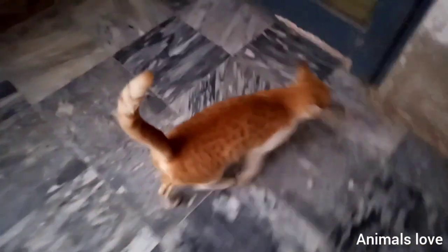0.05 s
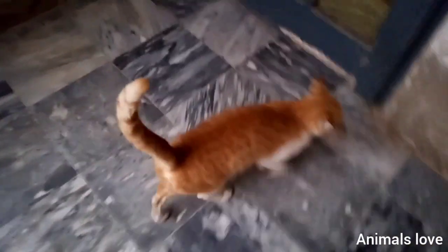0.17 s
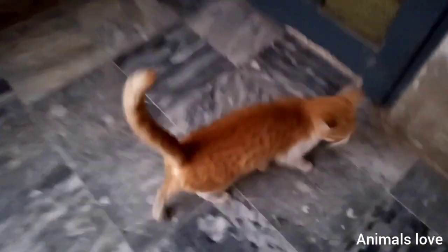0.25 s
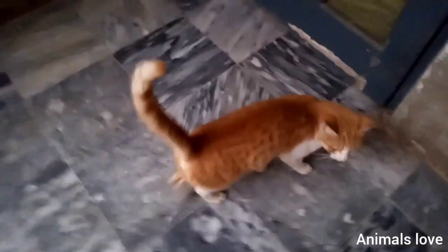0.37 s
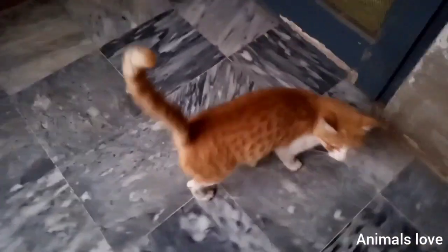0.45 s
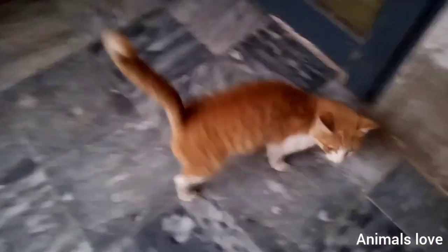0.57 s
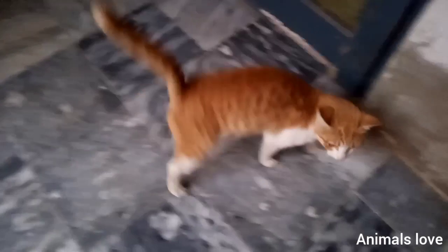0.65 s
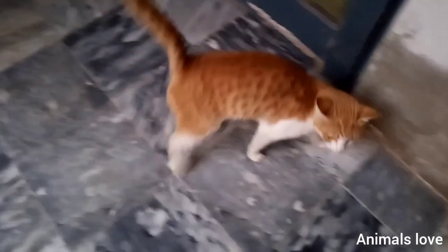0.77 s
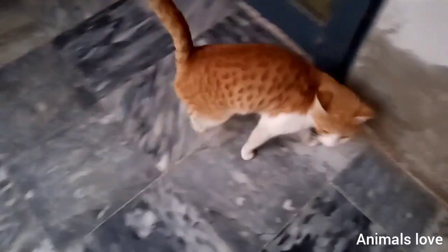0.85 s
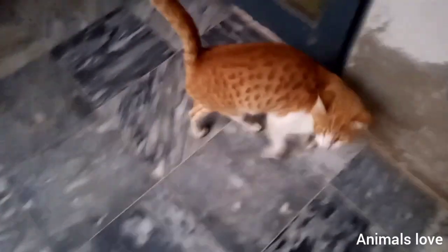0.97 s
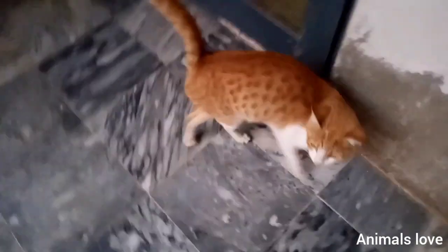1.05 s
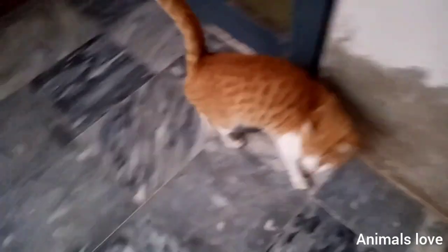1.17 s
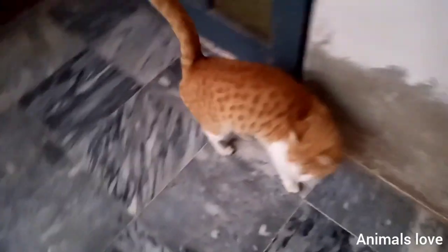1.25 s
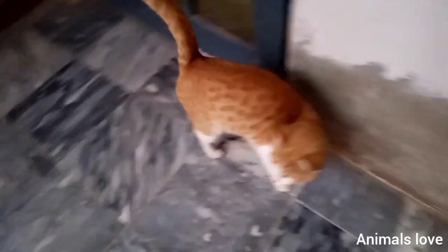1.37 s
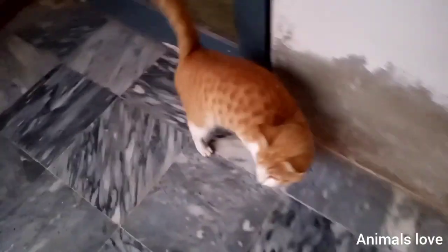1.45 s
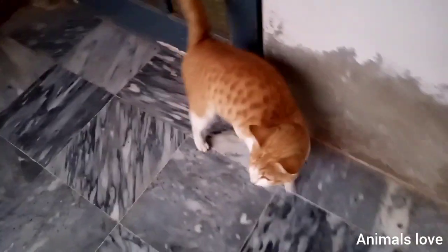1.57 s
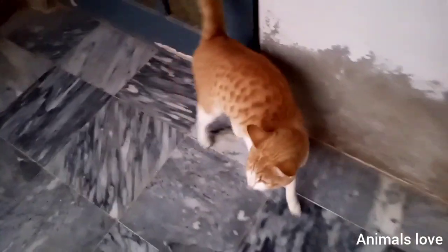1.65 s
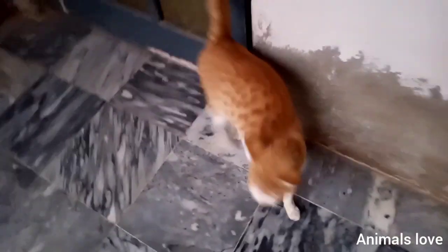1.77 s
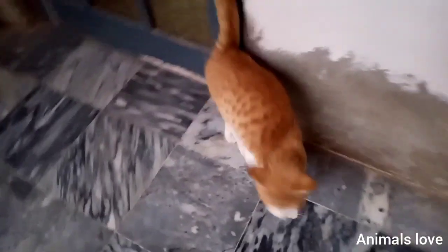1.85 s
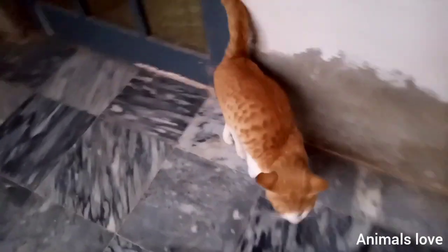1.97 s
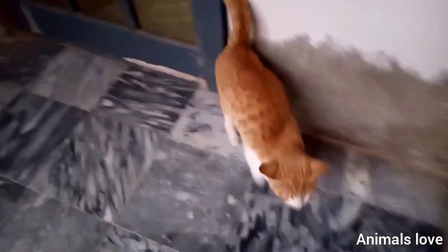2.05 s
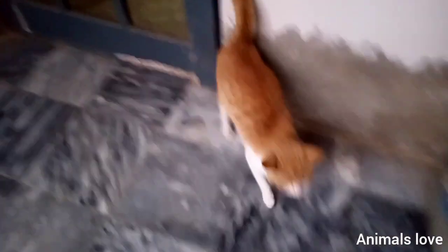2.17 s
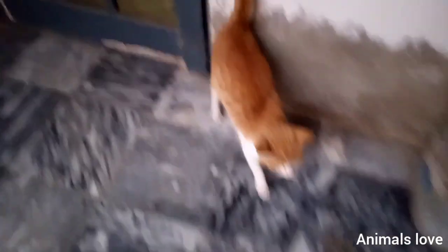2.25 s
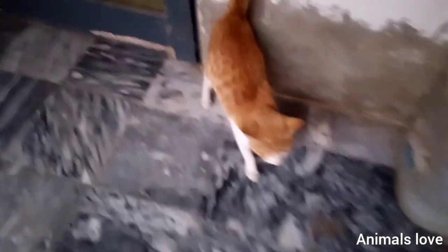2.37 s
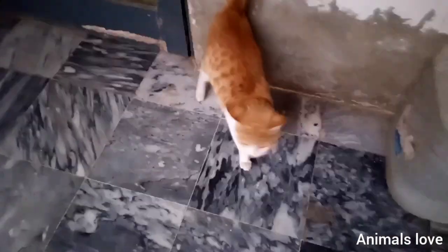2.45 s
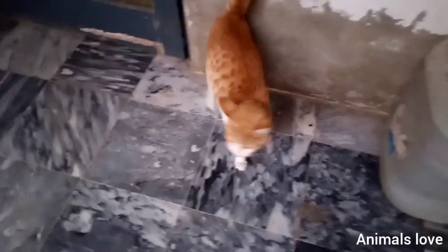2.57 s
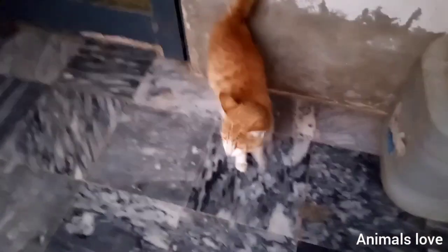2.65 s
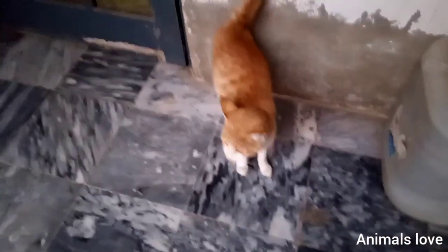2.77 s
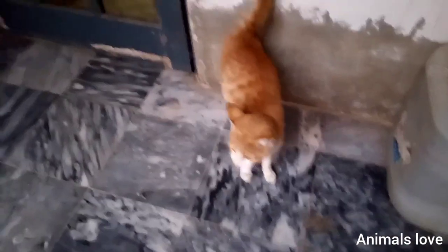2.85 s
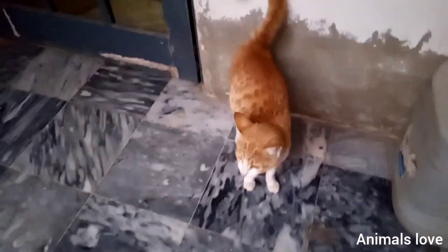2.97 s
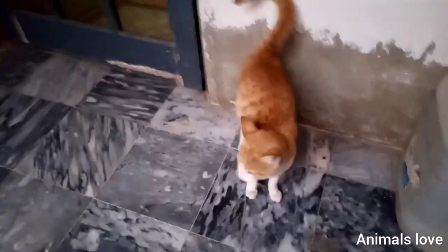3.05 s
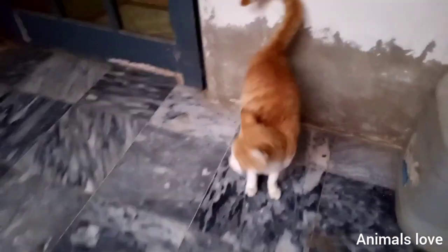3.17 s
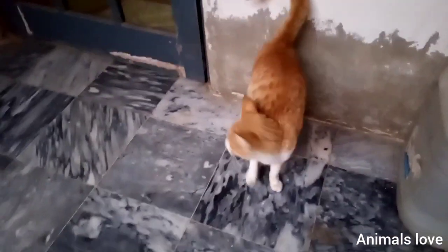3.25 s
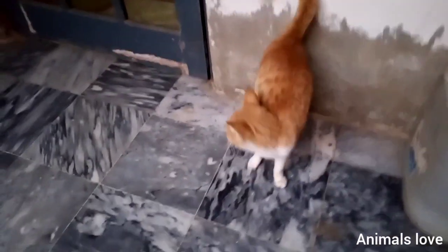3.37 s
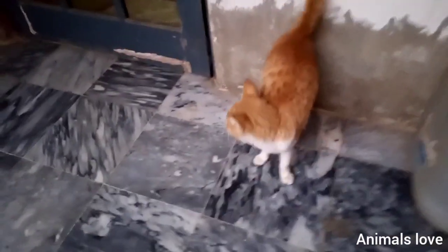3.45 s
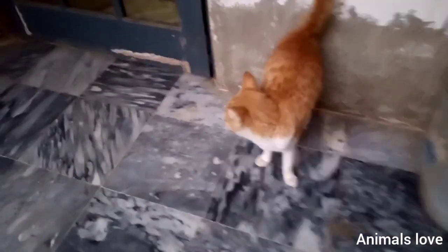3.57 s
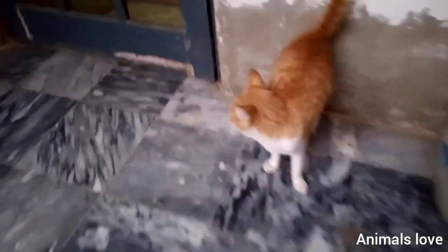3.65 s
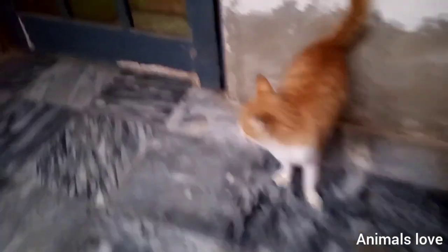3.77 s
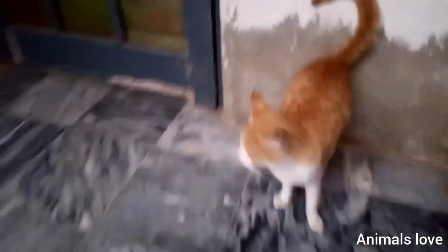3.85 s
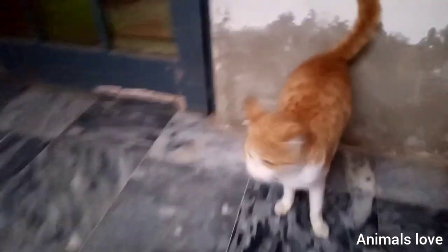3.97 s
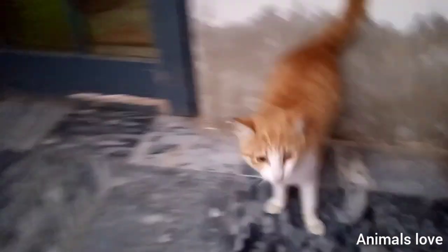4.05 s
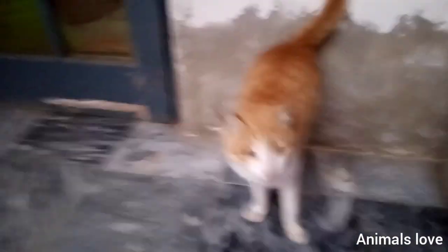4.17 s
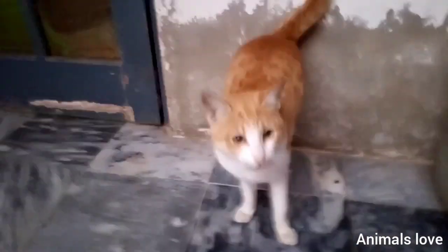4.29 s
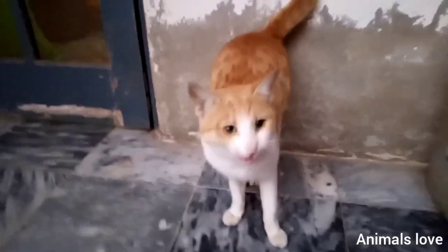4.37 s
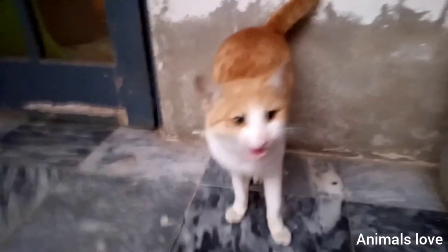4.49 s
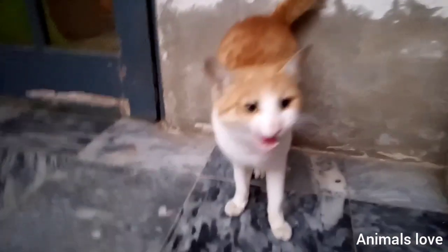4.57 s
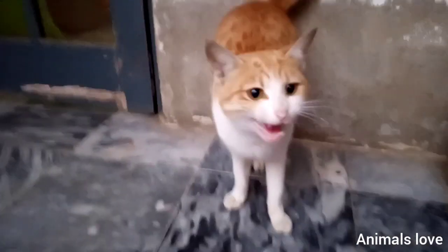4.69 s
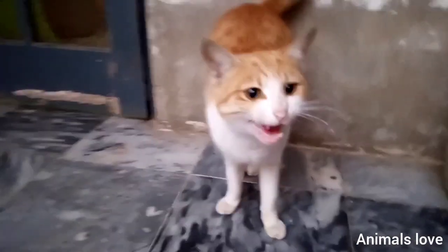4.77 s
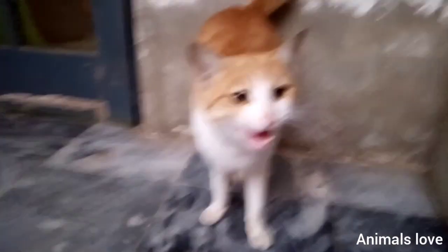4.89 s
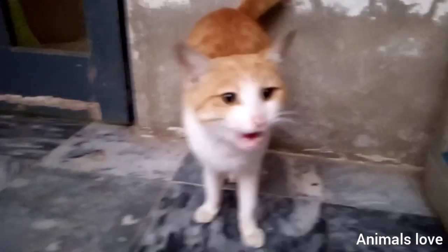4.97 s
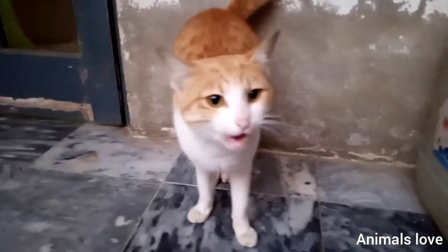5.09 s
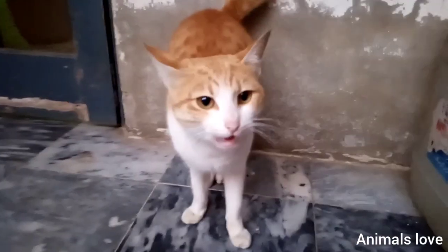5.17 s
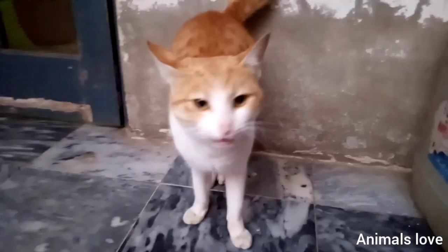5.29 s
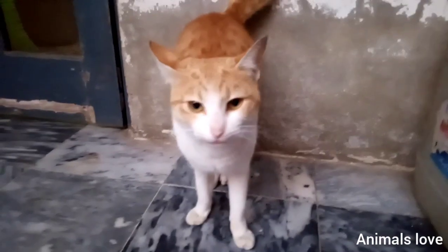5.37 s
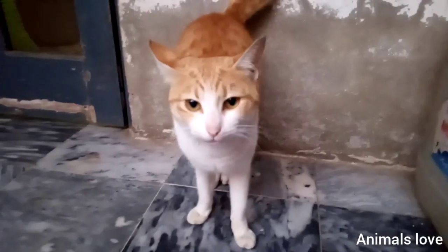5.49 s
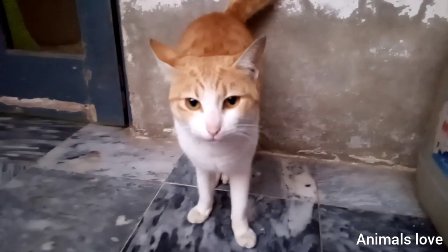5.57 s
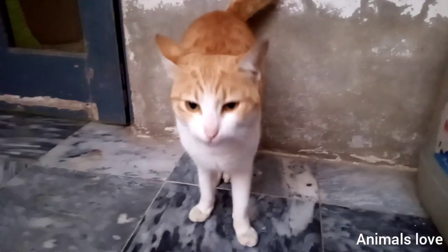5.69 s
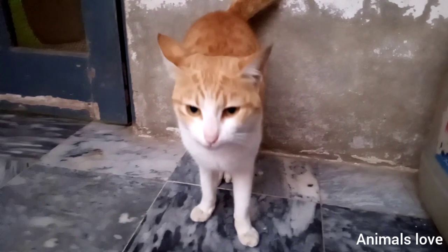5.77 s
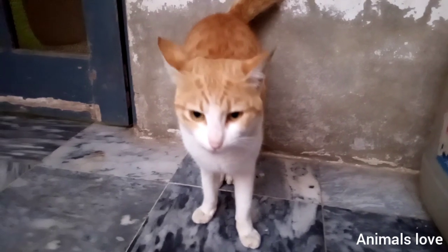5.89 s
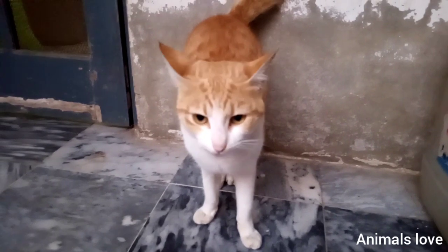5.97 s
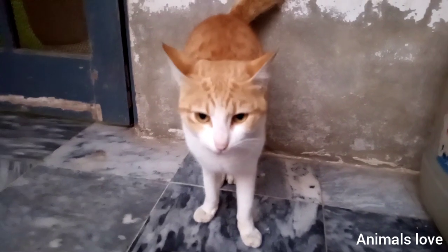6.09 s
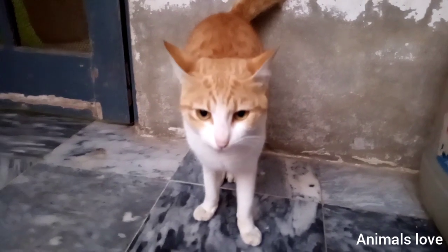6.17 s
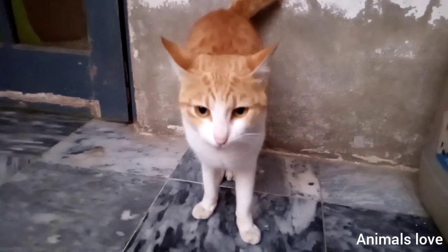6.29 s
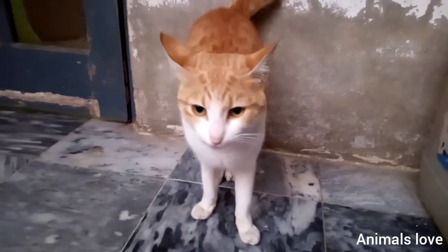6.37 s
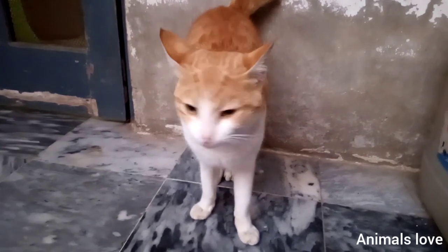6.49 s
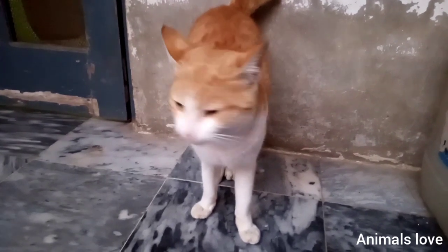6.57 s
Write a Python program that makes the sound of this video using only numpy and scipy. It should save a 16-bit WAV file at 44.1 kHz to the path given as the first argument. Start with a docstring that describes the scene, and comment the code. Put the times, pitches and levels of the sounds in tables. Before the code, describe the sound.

In a quiet hard room, a cat meows twice at length amid faint rubs and footfalls, before something heavy drags, squeals and booms.

```python
"""A cat on a stone floor ends one meow amid a few ticks and two spurts of thin hiss.
Skin rubs and slides, soft footfalls sound, and a thin whine comes and goes over the quiet hiss of a hard room.
Two long meows follow, each opening from a closed-mouth murmur: harmonics of the vocal folds pass nose and mouth.
At the end something heavy, perhaps a door, scrapes along in slips, squeals, thumps and booms on.
"""
import sys
import numpy as np
from scipy import signal
from scipy.fft import rfft, irfft, next_fast_len
from scipy.io import wavfile

SR = 44100
rng = np.random.default_rng(int(sys.argv[2]) if len(sys.argv) > 2 else 0)


def digitize_waveform(pressure):
    """Quantize a signal to 16-bit integers and store it at the path in sys.argv[1].

    Rows of a 2-D input are taken as channels; values are limited to [-1, 1].
    """
    field = np.atleast_2d(pressure).T
    bounded = np.clip(field, -1, 1)
    quanta = np.round(bounded * 32767).astype(np.int16)
    wavfile.write(sys.argv[1], SR, quanta)


N = 292383
TIME = np.arange(N) / SR


def amp(db):
    """Decibels to gain."""
    return 10 ** (np.asarray(db) / 20)


def unit(x):
    """Scales to rms 1."""
    return x / np.sqrt(np.mean(x ** 2) + 1e-20)


def read(points, hz):
    """Reads a spectrum on a log-frequency axis."""
    f, value = np.transpose(points)
    return np.interp(np.log(hz + 1), np.log(f + 1), value)


def follow(rows, t):
    """Reads every column of a curve at the times t."""
    s, *columns = np.transpose(rows)
    return [np.interp(t, s, c) for c in columns]


def add(mix, s, sound):
    """Mixes a sound in at time s."""
    part = mix[max(0, round(s * SR)):][:len(sound)]
    part += sound[:len(part)]


def colour(x, points):
    """Filters by a spectrum, to rms 1."""
    gain = amp(read(points, np.fft.rfftfreq(len(x), 1 / SR)))
    return unit(irfft(rfft(x) * gain, len(x)))


def wander(size, hz):
    """Smooth chance up to about a given rate, rms 1."""
    n = next_fast_len(size)
    f = np.fft.rfftfreq(n, 1 / SR)
    spectrum = rfft(rng.standard_normal(n)) / (1 + (f / hz) ** 4)
    return unit(irfft(spectrum, n))[:size]


def ring(x, hz, width):
    """A resonance of about unit gain at its centre."""
    r = np.exp(-np.pi * width / SR)
    pole = r * np.exp(2j * np.pi * hz / SR)
    return 2 * signal.lfilter([1 - r], [1, -pole], x).real


def die_away(x, t60):
    """Lets each band decay at its own speed."""
    hz, t, z = signal.stft(x, SR, nperseg=256)
    decay = 1000. ** (-t / read(t60, hz)[:, None])
    return signal.istft(z * decay, SR)[1][:len(x)]


def swell(s, rise, fall, hold=0):
    """An envelope that grows up to time s, holds, and dies away."""
    before, after = (s - TIME) / rise, (TIME - s - hold) / fall
    return np.exp(-np.maximum(np.maximum(before, after), 0))


# tone of the room's hiss: pitch_hz, level_db
AIR = [(30, -2), (120, 3), (300, -5), (700, -9.5), (1300, -14), (1800, 3), (3000, -8), (6600, -5.5),
       (7600, -24), (9000, -27.5), (13500, -30), (15200, -30)]
# the hiss drops into brief lulls and sinks away after the last meow: time_s, level_db
AIR_LEVEL = [(1.24, -2.5), (1.32, -3.5), (1.5, 1.5), (1.62, 0), (2.74, 3.5), (2.9, -3.5), (2.97, 2.5),
             (3.24, 0), (3.5, 3), (5.42, 0.5), (5.6, 0), (6.05, -5.5), (6.3, -6.5)]
AIR_DB, AIR_WAVER_DB = -69, 0.7  # base level; rms waver


def air():
    """The quiet, wavering hiss of the room: coloured noise."""
    lull_db, = follow(AIR_LEVEL, TIME)
    level_db = AIR_DB + lull_db + AIR_WAVER_DB * wander(N, 14)
    return colour(rng.standard_normal(N), AIR) * amp(level_db)


# how long the room's echoes take to fall 60 dB: pitch_hz, t60_s
ROOM_T60 = [(200, 0.36), (1000, 0.56), (3000, 0.58), (8000, 0.55)]


def room(x, first=.004):
    """Dense echoes from stone floor and plaster walls, the first after a few milliseconds."""
    signs = rng.choice([-1., 1.], SR)
    hits = rng.random(SR) < 3000 / SR  # about 3000 echoes a second
    taps = signs * hits * (np.arange(SR) > first * SR)
    tail = die_away(taps, ROOM_T60)
    return signal.fftconvolve(x, tail / np.linalg.norm(tail))[:N]


# a thin whine comes and goes: start_s, hold_s, level_db
WHINES = [(0.46, 0.52, -72), (1.152, 0.9, -80), (3.4, 0.68, -76.5)]
WHINE_HZ, WHINE_EDGE_S = 966, 0.069  # pitch; fade on either side of the hold
WHINE_WAVER_DB, WHINE_JITTER = 1.5, 0.008  # rms level waver; rms share of the pitch


def whine():
    """A faint background whine: one sine, slightly unsteady in pitch and level."""
    level = sum(amp(db) * swell(s, WHINE_EDGE_S, WHINE_EDGE_S, hold) for s, hold, db in WHINES)
    pitch = WHINE_HZ * (1 + WHINE_JITTER * wander(N, 40))
    phase = 2 * np.pi * np.cumsum(pitch) / SR
    return unit(np.sin(phase)) * level * amp(WHINE_WAVER_DB * wander(N, 12))


# tone of the hiss spurts: pitch_hz, level_db
HISS_BAND = [(5400, -21), (6200, 0.5), (6600, 11.5), (6950, 3), (7500, -33.5), (8200, -42)]
# spurts of thin high hiss: peak_s, level_db
HISSES = [(0, -44.5), (0.136, -42.5)]
HISS_RISE_S, HISS_FALL_S = 0.013, 0.072


def hiss(flutter_db=1.1):
    """A narrow, fluttering band of high noise."""
    level = sum(amp(db) * swell(s, HISS_RISE_S, HISS_FALL_S) for s, db in HISSES)
    return colour(rng.standard_normal(N), HISS_BAND) * level * amp(flutter_db * wander(N, 53))


# soft footfalls and bumps: start_s, level_db, low_edge_hz, high_edge_hz, t60_s
STEPS = [(0.353, -58, 656, 1120, 0.33), (0.866, -54, 450, 2550, 0.3), (2.011, -48.5, 64.4, 157, 0.4),
         (2.088, -52.5, 70.57, 129, 0.44), (2.3, -54, 92, 129, 0.8), (2.298, -48.5, 246.7, 365, 0.26),
         (2.328, -47.5, 163, 525, 0.71), (4.018, -63, 120, 254, 0.47), (4.749, -55, 45, 91, 0.16),
         (5.286, -49.5, 231, 440, 0.25)]


def steps(rise=0.019):
    """Dull pushes on the floor: band-limited noise that dies away."""
    out, t = np.zeros(N), np.arange(SR) / SR
    for s, db, low_hz, high_hz, t60 in STEPS:
        b, a = signal.butter(2, [low_hz, high_hz], "band", fs=SR)
        thud = unit(signal.lfilter(b, a, rng.standard_normal(SR)))
        add(out, s, amp(db) * thud * amp(-60 * t / t60) * np.minimum(t / rise, 1))
    return out


# short rubs, levels before the layer gains: peak_s, level_db, sizzle_db re the rub, rise_s
RUBS = [(0.416, -50, -15, 0.037), (1.067, -54.5, -16, 0.045), (1.231, -57, -3, 0.012),
        (2.177, -46.5, -12.5, 0.015), (2.299, -55, -6, 0.04), (2.639, -51, -8, 0.0065),
        (3.07, -62, -32, 0.017), (3.354, -39.5, -9.5, 0.018), (3.728, -46, -2, 0.0066),
        (4.01, -35.5, -0.5, 0.014), (4.1, -57.5, 3.5, 0.019), (6.41, -44, -25, 0.021)]
# soft slides of the hand, levels likewise: start_s, hold_s, level_db, sizzle_db re the slide
SLIDES = [(0.626, 0.58, -55.5, -29), (2.289, 0.35, -52, -37), (3.01, 0.69, -60.5, -26),
          (3.702, 0.67, -53.5, -11.5), (4.397, 0.75, -60, -11)]
# tone of the skin noise: pitch_hz, level_db
RUB = [(240, -34), (400, -19), (535, -4), (793, -71), (945, -1.5), (1190, -6), (2040, 7), (4690, -1.5),
       (5270, -0.5), (6370, 4), (7370, -4), (9710, -35.5), (13000, -41)]
# tone of the sizzle at the very top: pitch_hz, level_db
SIZZLE = [(9000, -11.5), (13000, -16), (14500, -4.5), (15200, 9.5), (16000, -26)]
RUB_FALL_S, SLIDE_EDGE_S = 0.026, 0.11


def rubs(rub_db=-10, sizzle_db=-10, grain_db=1.5):
    """Grainy swishes of rubbing skin: noise of uneven level, with a sizzle at the very top."""
    body, top = np.zeros(N), np.zeros(N)
    for s, db, top_db, rise in RUBS:
        stroke = amp(db) * swell(s, rise, RUB_FALL_S)
        body += stroke
        top += stroke * amp(top_db)
    for s, hold, db, top_db in SLIDES:
        stroke = amp(db) * swell(s, SLIDE_EDGE_S, SLIDE_EDGE_S, hold)
        body += stroke
        top += stroke * amp(top_db)
    grains = rng.standard_normal(N) * amp(grain_db * wander(N, 370))
    swish = amp(rub_db) * body * colour(grains, RUB)
    return swish + amp(sizzle_db) * top * colour(grains, SIZZLE)


# small ticks: start_s, peak_db, centre_hz, crackle_t60_s, crackle (share, 0-1)
TICKS = [(0.099, -30.5, 5970, 0.014, .1), (.102, -27, 4770, 0.009, 0.04), (.117, -40, 4400, 0.022, 0.5),
         (0.128, -42, 1920, 0.033, 0.17), (0.142, -38.5, 2500, 0.017, 0.34),
         (.863, -34.5, 1600, 0.021, 0.08), (0.869, -35.5, 1420, 0.018, 0.07),
         (0.885, -38.5, 1740, 0.035, 0.02), (3.085, -47, 4200, 0.017, .15), (3.326, -42, 3500, .01, 0.15),
         (3.891, -36.5, 3430, 0.0072, 0.33), (4.186, -46, 410, 0.065, 0.18)]


def ticks(damping=0.85, dull_hz=7200):
    """Hard little contacts: one damped swing and a brief crackle."""
    out, t = np.zeros(N), np.arange(SR // 10) / SR
    band = signal.butter(5, [250, dull_hz], "band", fs=SR, output="sos")
    for s, db, hz, t60, crackle in TICKS:
        push = (t == 0) + crackle * rng.standard_normal(len(t)) * amp(-60 * t / t60)
        swing = ring(ring(push, hz, damping * hz), hz, damping * hz)
        tick = signal.sosfilt(band, swing)
        add(out, s, amp(db) * tick / abs(tick).max())
    return out


# shoves that drag the door: start_s, length_s, groan_db, grating_db
SHOVES = [(5.647, 0.44, -62.5, -83), (5.997, 0.27, -54, -60.5), (6.28, 0.045, -61, -38.5),
          (6.33, 0.33, -50, -50.5)]
# resonances of the groaning panel: pitch_hz, width_hz, level_db
GROAN = [(280, 73, -7), (363.8, 8.5, 5), (396.7, 23, 0.5), (432, 65, -9.5)]
# tone of the grating grit: pitch_hz, level_db
GRATE = [(280, -65), (480, 3), (536, 7), (746, 1), (1110, -2.5), (2090, -10), (2280, -20.5), (2810, -25),
         (5120, -26), (5580, -33), (7670, -28.5), (9000, -80), (11700, -103), (19800, -120)]
SHOVE_RISE_S, SHOVE_FALL_S = 0.068, 0.027


def drag(slips_hz=65, unevenness=.35, grit=0.09):
    """Uneven slips make the door panel groan, and grit grates under it."""
    groaning, grating = np.zeros(N), np.zeros(N)
    for s, length, groan_db, grate_db in SHOVES:
        onset = np.clip((TIME - s) / SHOVE_RISE_S, 0, 1)
        push = onset * swell(s, SHOVE_RISE_S, SHOVE_FALL_S, length)
        groaning += amp(groan_db) * push
        grating += amp(grate_db) * push
    turns = np.cumsum(slips_hz * (1 + unevenness * wander(N, 49.92))) / SR
    # one click per slip, over a bed of grit noise
    slips = np.diff(np.floor(turns), prepend=0) + grit * rng.standard_normal(N)
    modes = [amp(db) * ring(ring(slips, hz, 2 * width), hz, 2 * width) for hz, width, db in GROAN]
    return unit(sum(modes)) * groaning + colour(slips, GRATE) * grating


# brief squeals of the dragging door: start_s, hold_s, pitch_hz, width_hz, level_db
SQUEALS = [(6.003, 0.19, 960, 169, -68), (6.02, 0.04, 1470, 120, -74.5), (6.279, 0.017, 2170, 350, -61),
           (6.393, 0.08, 6270, 350, -64), (6.518, 0.078, 2340, 298, -58)]


def squeals(edge_s=0.015):
    """The edge of the door catches and sings for a moment: noise through a narrow resonance."""
    out = np.zeros(N)
    for s, hold, hz, width, db in SQUEALS:
        song = unit(ring(ring(rng.standard_normal(N), hz, width), hz, width))
        out += amp(db) * song * swell(s, edge_s, edge_s, hold)
    return out


# blows of the door: start_s, thud_db, boom_db
THUMPS = [(6.292, -37.5, -43.5), (6.375, -51, -44), (6.53, -54.5, -51)]
# tone of the thud: pitch_hz, level_db
THUMP = [(29, -29), (50, 3), (109, 2), (286, -3), (343, -20), (683, -4.5), (766, -35), (839, -7),
         (1420, -12.5), (1560, -11), (2100, -15.5), (6460, -30.5), (12000, -66), (15600, -105),
         (22000, -120)]
# decay of the thud by band: pitch_hz, t60_s
THUMP_T60 = [(100, 0.83), (800, 0.36), (3000, 1), (7000, 0.81)]
# booming modes of the panel: pitch_hz, level_db, t60_s
DOOR = [(71.9, -0.5, 0.73), (88.5, -7, 0.72), (110.9, -1.5, 3.3), (158, -17, 1.3), (197.4, -14.5, 3.7),
        (304, -8, 1.9), (556, -17, 0.32), (775, -26, .35)]


def thump(rise=0.0037):
    """The door strikes and rebounds: a broad thud and the boom of its panel."""
    out, t = np.zeros(N), np.arange(SR) / SR
    for s, thud_db, boom_db in THUMPS:
        thud = die_away(colour(rng.standard_normal(SR), THUMP), THUMP_T60)
        modes = [amp(db - 60 * t / t60) * np.sin(2 * np.pi * (hz * t + rng.random()))
                 for hz, db, t60 in DOOR]
        blow = amp(thud_db) * thud + amp(boom_db) * sum(modes)
        add(out, s, blow * np.minimum(t / rise, 1))
    return out


# closed-mouth murmurs, level before swell and mix: start_s, length_s, middle_pitch_hz, level_db
MURMURS = [(1.21, 0.077, 181.7, -60), (1.335, 0.13, 200, -50.5), (4.215, 0.089, 178.5, -55.5)]
MURMUR_OCTAVES_PER_S = 4.5  # each one slides up


def murmur(start, length, hz, db, jitter=0.15, overtone_db=-16):
    """A low, unsteady hum that swells and slides up before the mouth opens."""
    t = np.arange(0, length, 1 / SR)
    pitch = hz * 2 ** (MURMUR_OCTAVES_PER_S * (t - length / 2))
    phase = 2 * np.pi * np.cumsum(pitch * (1 + jitter * wander(len(t), 110))) / SR
    # overtones fall by overtone_db per octave
    hum = sum(amp(overtone_db * np.log2(k)) * np.sin(k * phase) for k in range(1, 7))
    return start, unit(hum) * amp(db) * np.sin(np.pi * t / length)


# pitch of the three meows before jitter: time_s, pitch_hz
PITCH_1 = [(0.0, 573), (0.138, 541.7), (0.172, 510), (0.23, 492)]
PITCH_2 = [(1.47, 402.8), (1.54, 526.7), (1.572, 584), (1.612, 615.4), (1.638, 662.6), (1.692, 694),
           (1.79, 703.5), (1.874, 640.7), (2.064, 627), (2.346, 536.5), (2.4, 460)]
PITCH_3 = [(4.255, 289.8), (4.3, 349), (4.34, 466.4), (4.374, 556), (4.388, 661.3), (4.438, 681.5),
           (4.474, 732.3), (4.57, 723.3), (4.632, 712.4), (4.724, 657), (4.842, 632.6), (4.92, 606.6),
           (5.05, 584.3), (5.086, 586.4), (5.17, 542.4), (5.23, 531.4), (5.272, 513), (5.296, 452),
           (5.32, 374)]
# roughness re the clean tone, as the folds settle and creak to a stop: time_s, rasp_db, half_harmonics_db
ROUGH_1 = [(0, -9.5, -39), (0.23, 3, -38)]
ROUGH_2 = [(1.48, -9, -21), (1.65, -13.5, -31.5), (1.9, -22, -36.5), (2.3, -7.5, -31), (2.4, -18, -22)]
ROUGH_3 = [(4.28, 4, -8), (4.33, 6.5, -17), (4.375, 14, -15), (4.395, -17, -17.5), (4.48, -12.5, -10),
           (4.56, -21.5, -30.5), (4.75, -18, -33), (4.98, -21, -38), (5.24, -20.5, -49), (5.31, -8, -13)]
# jaw and tongue move two mouth resonances: time_s, lower_hz, upper_hz, upper_height_db
VOWEL_1 = [(0, 1810, 3600, 10), (0.23, 1890, 3400, 6)]
VOWEL_2 = [(1.5, 1970, 2420, 5.4), (1.57, 2350, 2930, 11), (1.66, 2720, 3430, 7.8), (1.79, 2920, 3620, 8.3),
           (1.87, 2600, 3100, 8.9), (1.95, 2920, 3380, 8), (2.03, 3320, 3940, 4.7), (2.11, 3470, 3900, 4.5),
           (2.24, 2770, 3930, 6)]
VOWEL_3 = [(4.29, 1870, 2500, 6.5), (4.37, 2300, 2900, 12), (4.41, 2700, 3280, 7.4),
           (4.48, 2490, 3340, 1.6), (4.58, 2600, 4350, 4.2), (4.67, 2670, 4170, 6.2),
           (4.71, 3270, 3950, 3.8), (4.84, 3150, 3760, 4), (4.95, 3000, 3600, 3), (5.06, 2930, 3995, 4.07),
           (5.13, 2670, 3993, 6.2), (5.22, 2200, 3760, 2.2)]
# meows, levels before the mix: pitch_curve, lips_part_s, parting_s, jaw_widest_s, lips_close_s, mouth_db,
# jaw_swell_db, closing_drop_db, vowel_curve, low_harmonic_thinning_db, nasal_hum_db,
# hum_lost_until_lips_close_db, second_harmonic_of_hum_db, bright_edge_db, roughness_curve, tremor_db,
# flutter (share, 0-1), growth_behind_shut_lips_db_per_s2, floor_dip_hz
MEOWS = [(PITCH_1, -0.64, .02, -0.058, 0.019, -40, 5.7, 6.6, VOWEL_1, 0.89, -43.5, 16, -13, -58, ROUGH_1, 0, 0, 0, 2850),
         (PITCH_2, 1.618, 0.022, 2.055, 2.128, -34, 3.6, 9.2, VOWEL_2, 5.2, -47.5, 7, -5, -49, ROUGH_2, 1.6, 0.23, 650, 4330),
         (PITCH_3, 4.388, 0.0044, 4.73, 5.16, -26, 12.9, 1, VOWEL_3, 0, -45.5, 0.83, 0, -38.5, ROUGH_3, 0.22, 0.06, 40, 3540)]
SHUT_DB, SAG_DB_PER_S, TREMOR_HZ = -11.5, 11.5, 16.14  # level behind shut lips; effort sags and trembles
# treble loss in dB per octave: always, more before parting, more after closing
MUFFLE_OPEN_DB, MUFFLE_SHUT_DB, MUFFLE_CLOSING_DB = 0.5, 13.5, 3
SETTLE_S, UNSETTLED_EDGE_DB = 0.18, -15  # the folds find their full tone; until then less treble
ATTACK_S, CLOSE_S, RELEASE_S = .045, 0.017, 0.048  # voice starts, lips close, voice stops
FLUTTER_HZ, FLUTTER_S = 50, 0.033  # the voice flutters just before the lips close
EDGE_SINK = 0.081  # share by which the high resonances sink as the jaw closes


def meow_controls(curve, part_s, parting_s, widest_s, close_s, mouth_db, swell_db, drop_db, vowel,
                  thin_db, hum_db, hum_lost_db, second_db, edge_db, roughness, tremor_db, flutter,
                  build_db_per_s2):
    """The lips part, the jaw opens and shuts, the lips close: levels, resonances and rasp follow."""
    start, end = curve[0][0], curve[-1][0]
    t = np.arange(start, end, 1 / SR)
    pitch, = follow(curve, t)
    begun = min(start, part_s)
    jaw = np.interp(t, [part_s, widest_s, end], [0, 1, 0])
    shut = .5 - .5 * np.tanh((t - part_s) / parting_s)
    closed = .5 + .5 * np.tanh((t - close_s) / CLOSE_S)
    unsettled = np.exp(-((t - begun) / SETTLE_S) ** 2)
    voicing = np.minimum((t - begun) / ATTACK_S, 1) * np.minimum((end - t) / RELEASE_S, 1)
    flutter_swell = np.exp(-((t - close_s) / FLUTTER_S + 1) ** 2)
    voicing *= 1 + flutter * flutter_swell * np.cos(2 * np.pi * FLUTTER_HZ * (t - close_s))
    build_db = build_db_per_s2 * np.maximum(part_s - t, 0) ** 2
    lips_db = SHUT_DB * shut - build_db - drop_db * closed
    tremble_db = tremor_db * np.cos(2 * np.pi * TREMOR_HZ * (t - widest_s))
    effort_db = tremble_db - swell_db * (1 - jaw) ** 2 - SAG_DB_PER_S * (t - part_s)
    level_db = mouth_db + lips_db + effort_db
    # the hum and the bright edge are passed on re the level from the mouth
    nose_db = hum_db - hum_lost_db * (1 - closed) - level_db
    bright_db = edge_db + lips_db + UNSETTLED_EDGE_DB * unsettled - level_db
    muffle_db = MUFFLE_OPEN_DB + MUFFLE_SHUT_DB * shut + MUFFLE_CLOSING_DB * closed
    rasp_db, halves_db = follow(roughness, t)
    sunk = 1 - EDGE_SINK * np.interp(t, [widest_s, close_s], [0, 1])
    return (t, pitch, voicing, level_db, nose_db, second_db, bright_db, follow(vowel, t), thin_db,
            rasp_db, halves_db, muffle_db, sunk, closed)


# tone of the mouth: pitch_hz, level_db
MOUTH = [(1300, -31.5), (1600, -3), (2100, 3), (2450, -1.5), (3000, 1), (3800, 4), (4400, -1.5),
         (4900, -60.5)]
# tone of the nose: pitch_hz, level_db
NOSE = [(350, -15), (450, 1), (520, -6), (555, -4.5), (592, 0.5), (645, -14.5), (720, -15.5), (900, -7.5),
        (1080, -2.5), (1200, -1), (1300, -4.5), (1450, -13.5)]
# bright edge with the mouth wide: pitch_hz, level_db
EDGE = [(4150, -13), (4500, 6), (5100, 5), (5720, 1.5), (6430, 4.5), (7000, -7), (7700, -15), (8500, -38),
        (10500, -34.5), (12000, -67.5)]
# bright edge with the lips closed: pitch_hz, level_db
NOSE_EDGE = [(3700, -5), (4200, -0.5), (4800, -6), (5350, -10), (5900, -1.5), (6450, 4.5), (7000, -14),
             (7600, -8), (8500, -45), (9500, -31), (11000, -61)]
# antiresonances of the nose: pitch_hz, half_width_hz, full_depth_db
NOTCHES = [(1730, 43, 2), (3150, 190, 25)]
# fixed resonances beside the moving ones: pitch_hz
THROAT_HZ = [1920, 5260, 6500]
# tone of the escaping air: pitch_hz, level_db
THROAT_NOISE = [(900, -18.5), (1400, -11.5), (1800, -6), (2400, -8), (3200, -6.5), (4000, 4), (4700, -7.5),
                (6300, -2), (7500, -12), (9000, -51.5)]
THIN_BELOW_HZ = 2270  # where the thinning of the low harmonics sets in
FLOOR_DIP_DB, FLOOR_DIP_WIDTH = 16, 31  # the floor echo weakens one narrow band (half width in Hz)
PHASE_DRIFT = 0.8  # rms radians


def meow(row, jitter=0.00296, shimmer=0.058, width_hz=520, peak_half_hz=310, focus_db=9, rasp_hz=190,
         skirt_db=-3, flicker_db=1.83, turbulence_db=1.0, lips_hz=1850, lips_width=850,
         hum_waver_db=1.5):
    """Harmonics of the vocal folds leave by the nose and by a mouth whose resonances move as it opens."""
    *gesture, dip_hz = row
    (t, pitch, voicing, level_db, hum_db, second_db, edge_db, vowel, thin_db,
     rasp_db, halves_db, muffle_db, sunk, closed) = meow_controls(*gesture)
    mouth_hz, upper_hz, upper_db = vowel
    k = np.arange(1, 21)[:, None]  # harmonic numbers
    hz = k * pitch
    peaks = [(mouth_hz, focus_db), (upper_hz, upper_db)]
    resonance_db = sum(db / (1 + ((hz - centre) / peak_half_hz) ** 2) for centre, db in peaks)

    # the nose passes the two lowest harmonics, shaped by its own spectrum
    nose = ((k == 1) + (k == 2) * amp(second_db)) * amp(read(NOSE, hz))
    nasal_db = hum_db + 10 * np.log10((nose ** 2).sum(0))
    # the more sound goes through the nose, the deeper its side branch cuts notches
    nasality = 1 / (1 + amp(-nasal_db))
    notch_db = nasality * sum(depth / (1 + ((hz - f) / half) ** 2) for f, half, depth in NOTCHES)
    low_cut_db = thin_db / (1 + (hz / THIN_BELOW_HZ) ** 10)
    tilt_db = muffle_db * np.log2(hz / mouth_hz)
    mouth = amp(read(MOUTH, hz) + resonance_db - notch_db - low_cut_db - tilt_db)
    edge = amp((1 - closed) * read(EDGE, hz / sunk) + closed * read(NOSE_EDGE, hz))
    waver_db = hum_waver_db * (1 - closed) * wander(len(t), 20.6)
    # the three paths add in power, each at its own level
    paths = [(mouth, 0), (nose, nasal_db + waver_db), (edge, edge_db - muffle_db)]
    gains = np.sqrt(sum((g * amp(db)) ** 2 / (g ** 2).sum(0) for g, db in paths))
    gains = gains * amp(-FLOOR_DIP_DB / (1 + ((hz - dip_hz) / FLOOR_DIP_WIDTH) ** 2))

    # each resonance delays the harmonics near it, so a pulse rings on through its cycle
    centres = [mouth_hz, upper_hz, *THROAT_HZ]
    lag = sum(np.arctan((hz - centre) / (width_hz / 2)) for centre in centres)
    # near reflections shift each harmonic's phase slowly as the head moves
    lag = lag + PHASE_DRIFT * np.array([wander(len(t), 2.2) for _ in k])
    phase = 2 * np.pi * np.cumsum(pitch * (1 + jitter * wander(len(t), 57))) / SR
    # each harmonic flickers on its own, the high ones most
    unsteady = np.sqrt(hz / 3500)
    gains = gains * amp(flicker_db * unsteady * np.array([wander(len(t), 40) for _ in k]))

    # uneven closing of the folds spreads a skirt of rasp round each harmonic
    chance = rng.standard_normal(hz.shape) + 1j * rng.standard_normal(hz.shape)
    skirt = signal.lfilter(*signal.butter(2, rasp_hz, fs=SR), chance)
    rasp = amp(rasp_db)
    roughened = 1 + amp(skirt_db) * rasp * unsteady * skirt / skirt.std()
    partials = roughened * np.exp(1j * (k * phase - lag))
    # strong and weak cycles alternate, which sounds half harmonics
    partials = partials * (1 + amp(halves_db) * np.minimum(unsteady, 1) * np.exp(-1j * phase / 2))

    # air escapes in a puff once a cycle, hollow while the lips are nearly shut
    puffs = colour(rng.standard_normal(len(t)) * (1 + np.cos(phase)), THROAT_NOISE)
    opening = amp(-muffle_db)
    puffs = opening * puffs + (1 - opening) * unit(ring(puffs, lips_hz, lips_width))
    tone = np.sqrt(2) * (gains * partials.real).sum(0)
    voice = tone + amp(turbulence_db) * rasp * puffs
    level = amp(level_db) * (1 + shimmer * wander(len(t), 45)) / np.sqrt(1 + rasp ** 2)
    return t[0], voice * level * voicing


def scene(cat_db=-3.5, cat_room_db=-11, tick_room_db=-3, rub_room_db=-10):
    """The cat and the small noises in their room; cat, ticks and rubs raise echoes."""
    cat = np.zeros(N)
    for row in MEOWS:
        add(cat, *meow(row))
    for row in MURMURS:
        add(cat, *murmur(*row))
    tick, rub = ticks(), rubs()
    echoes = room(amp(cat_room_db) * cat + amp(tick_room_db) * tick + amp(rub_room_db) * rub)
    near = amp(cat_db) * cat + tick + rub + echoes
    door = drag() + squeals() + thump()
    return (near + steps() + hiss() + door + air() + whine())[None]


CUT_HZ = 15600  # top of the band


def record(dry):
    """The microphone loses the deepest bass; then the band limit."""
    thin = signal.sosfilt(signal.butter(4, 58, "high", fs=SR, output="sos"), dry)
    lowpass = signal.firwin(511, CUT_HZ, window=("kaiser", 9), fs=SR)
    return signal.oaconvolve(thin, lowpass[None], "same")


dry = scene()
out = record(dry)
digitize_waveform(out)
```